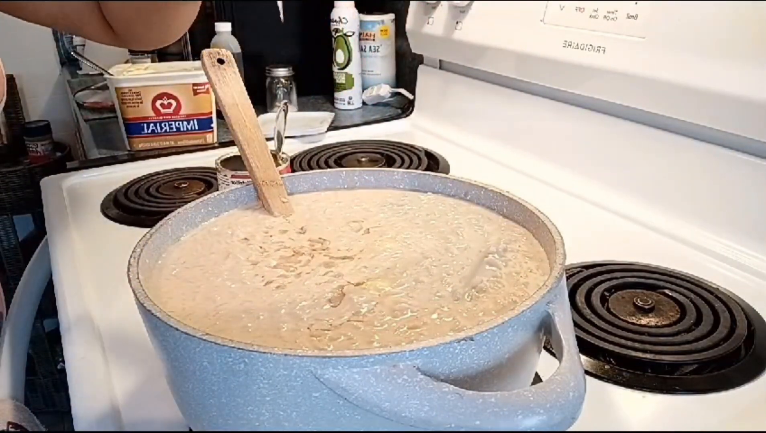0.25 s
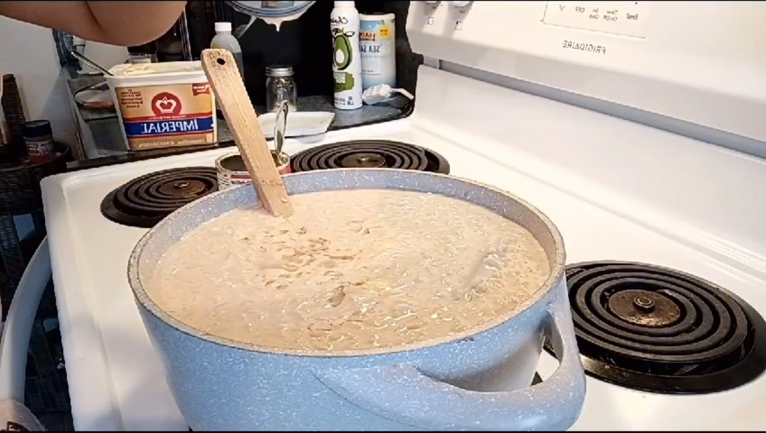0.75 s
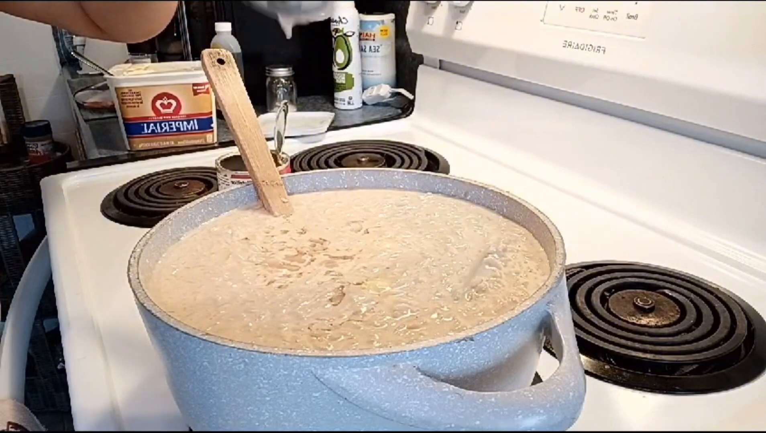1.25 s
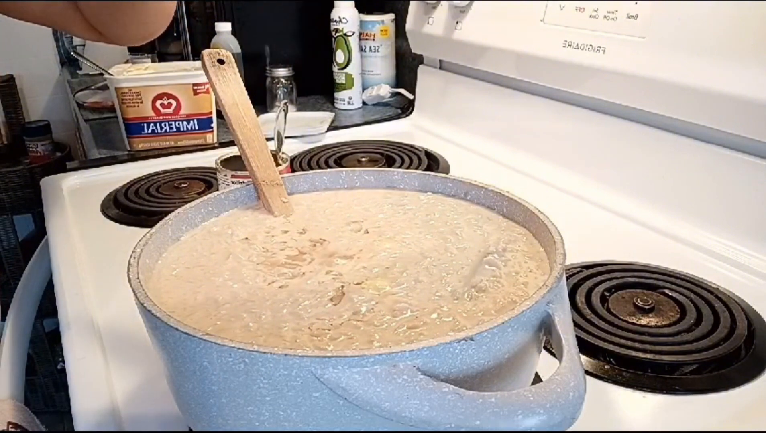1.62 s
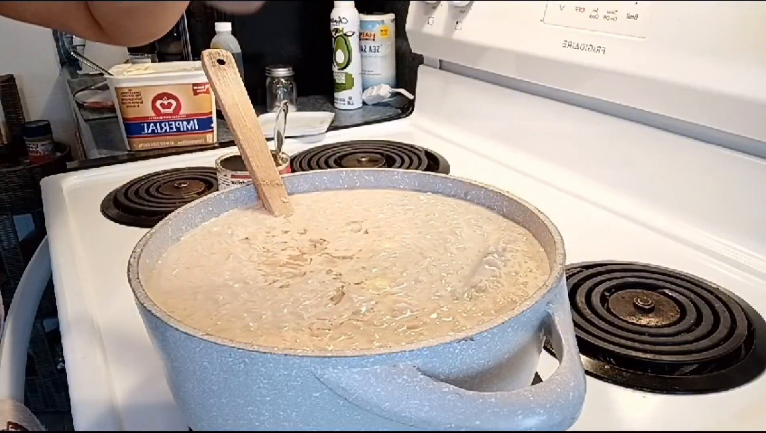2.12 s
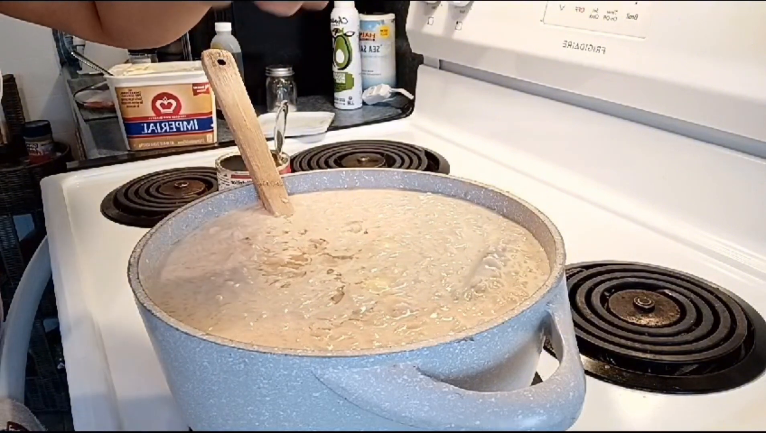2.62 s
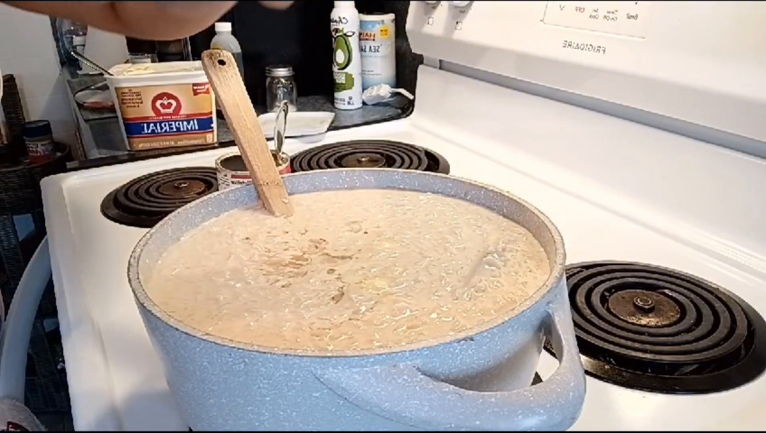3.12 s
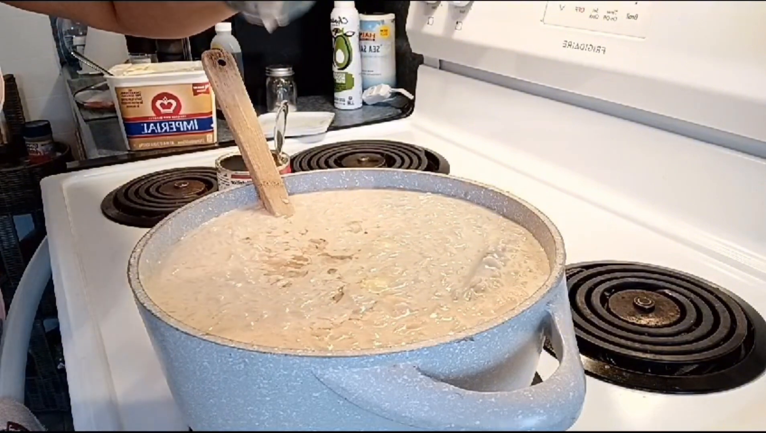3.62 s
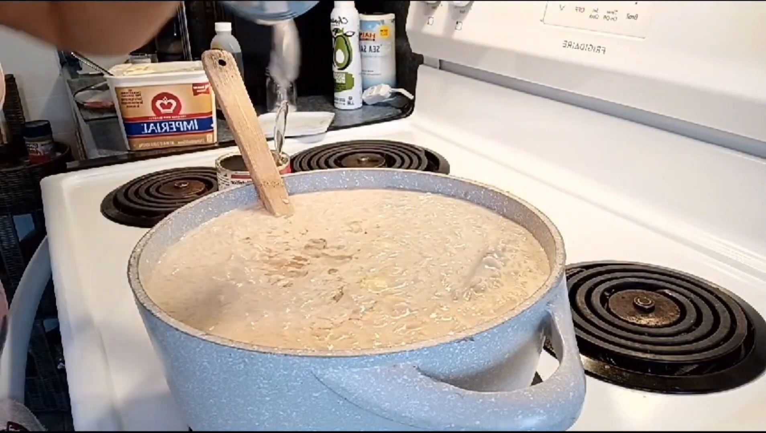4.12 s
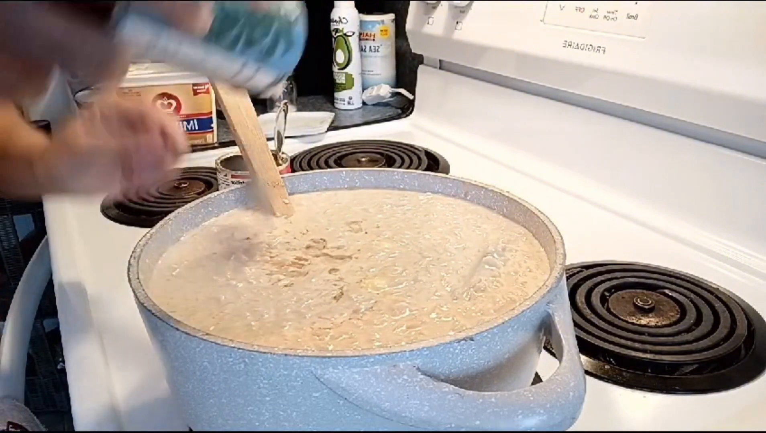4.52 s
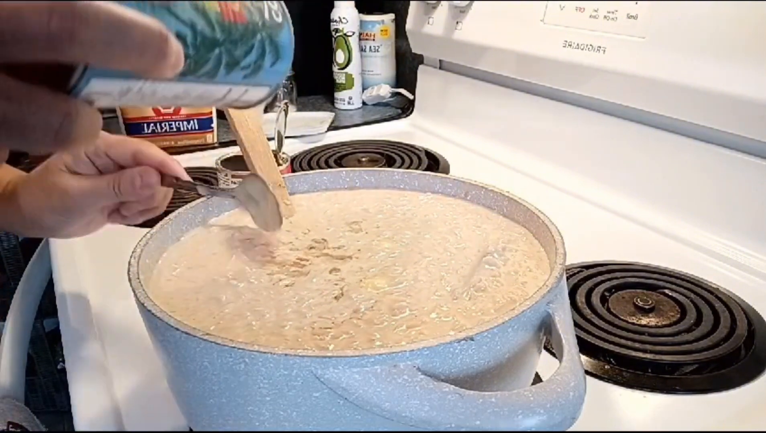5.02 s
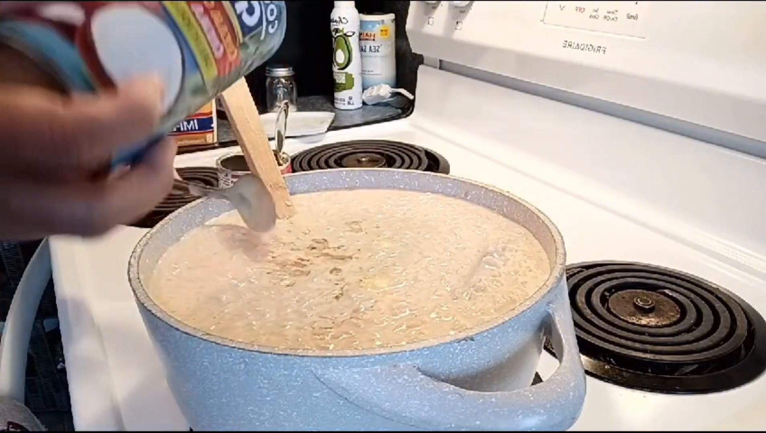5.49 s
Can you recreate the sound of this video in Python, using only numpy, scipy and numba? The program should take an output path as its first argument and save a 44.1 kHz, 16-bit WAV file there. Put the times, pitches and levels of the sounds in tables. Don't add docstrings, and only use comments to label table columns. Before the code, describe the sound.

Light hollow knocks and short scratchy scrapes come from a spoon in a half-empty can, sparser and quieter midway. A hard knock leads into a loud stuttering scrape, then a brief lull with a dull gluey groan. Ten dry, bright metallic clacks with low thumps finish, echoing briefly over low room hum, heard close up in stereo.

```python
import sys
import numpy as np
from scipy import signal
from scipy.fft import rfft, irfft
from scipy.io import wavfile
from numba import njit

SR = 44100
rng = np.random.default_rng(int(sys.argv[2]) if len(sys.argv) > 2 else 0)


def boost_factor(decibels):
    exponent = np.asarray(decibels, float) / 20
    return 10 ** exponent


def persist_wave(psi):
    counts = np.round(np.clip(psi, -1, 1) * 32767).astype(np.int16)
    wavfile.write(sys.argv[1], SR, np.atleast_2d(counts).T)


N = 253569
T = np.arange(N) / SR
SIDES = np.array([[1], [-1]])
SIZZLE_HZ, STEADY_TOP_HZ, TOP_HZ = 7700, 15900, 16900
GRIP_EASES_S = 2.66

# (time [s], blow [dB], air [dB], wall [dB], upper wall [dB])
KNOCKS = [(0.128, -43, -27, -4.5, -15), (0.204, -25, -9, -6.5, -44), (0.297, -40.5, -2, -19, -5.5),
          (0.556, -27, -1, -13, -17), (0.664, -32.5, -19, -7, -2.5), (0.696, -30.5, -1.5, -32, -5),
          (0.729, -37.5, -1, -37, -20), (0.777, -33.5, -9, -2, -44.5), (0.819, -35.5, -6, -3, -41),
          (0.862, -26.5, -7, -19, 2.5), (0.991, -33, -8, -45, -23), (1.307, -16.5, -18.5, -8.5, -6.5),
          (2.187, -61, -8, -43, -20), (2.297, -64, -1.5, -4, -21), (2.563, -47, -8, -45, -19),
          (2.937, -8, -9, 0.5, -50), (2.962, -24, -33, -18, -26), (3.003, -25, -2.5, -1, -34),
          (3.021, -43, -4, -20, -32), (3.484, -17, -8.5, -28, -22)]
# (time [s], blow [dB], rim pitch [Hz], sharpness [dB], thump [dB])
RAPS = [
    (4.3215, -26.5, 6050, -28, -11.5),
    (4.439, -17.5, 6420, -13.5, -26),
    (4.6024, -14, 6580, -20, -12),
    (4.778, -13, 6420, -18, -11),
    (4.936, -9.5, 6530, -21, -10.5),
    (5.0912, -9.5, 6780, -19, -12),
    (5.2492, -15, 6810, -13, -11.5),
    (5.4077, -13, 6940, -12.5, -10),
    (5.5758, -17.5, 6720, -11, -12),
    (5.7338, -8, 6400, -14, -16.5),
]
# (body pitch [Hz], body [dB], middle [dB], rim [dB], rim echo [dB])
RAP_SHAPE = [
    (2900, -20, -13.5, -22, 1.5),
    (3100, -24.5, -17, -18.5, 0.5),
    (3100, -25, -18.5, -17, -0.5),
    (3010, -28, -16.5, -15, -2.5),
    (3010, -27.5, -18.5, -19.5, -0.5),
    (3020, -21.5, -19.5, -19.5, -5.5),
    (3020, -20, -20, -19, 0.5),
    (2900, -19.5, -19, -19, -0.5),
    (2800, -17, -17.5, -15.5, -0.5),
    (2830, -21.5, -23.5, -26, 0.5),
]


def level(x, db):
    return x * boost_factor(db) / np.sqrt(np.mean(x ** 2))


def colour(x, table):
    hz, db = np.transpose(table)
    f = np.maximum(np.fft.rfftfreq(x.shape[-1], 1 / SR), 1)
    gain = boost_factor(np.interp(np.log(f), np.log(hz), db))
    return irfft(rfft(x) * gain, x.shape[-1])


def band(x, lo_hz, hi_hz):
    return signal.sosfilt(signal.butter(2, [lo_hz, min(hi_hz, .45 * SR)], "band", fs=SR, output="sos"), x)


def dip(x, hz, width_hz, depth):
    return x - depth * signal.lfilter(*signal.iirpeak(hz, hz / width_hz, SR), x)


def pan(db):
    return boost_factor(np.outer([.5, -.5], db))


def walk(rate, db):
    return np.interp(T, np.arange(400) / rate, boost_factor(db * rng.standard_normal(400)))


@njit
def ring(x, hz, t60):
    y, z, r = np.empty(len(x), np.complex128), 0j, np.exp(-np.log(1000) / (t60 * SR))
    for i in range(len(x)):
        z = z * r * np.exp(2j * np.pi * hz[i] / SR) + x[i] + 1e-18
        y[i] = z
    return y


def swell(x, hz, t60):
    return ring(ring(x, hz, t60).imag, hz, t60) / (t60 * SR / 9)


def ports(z, hz, skew_s, turn=None):
    chance = np.pi * hz * skew_s * rng.standard_normal()
    turn = chance if turn is None else turn
    return np.cos(turn) * z.imag + np.sin(turn) * z.real * SIDES


def modes(x, table, skew_s=1e-4, patchy_db=0., turn=None):
    out = 0
    for hz, db, t60 in table:
        pole = np.exp(2j * np.pi * hz / SR - np.log(1000) / (t60 * SR))
        drive = x * walk(11, patchy_db) + 1e-18
        out = out + ports(signal.lfilter([boost_factor(db)], [1, -pole], drive), hz, skew_s, turn)
    return out


def blows(times, db):
    x = np.zeros(N)
    x[np.minimum((times * SR).astype(int), N - 1)] = boost_factor(db)
    return x


def fade(x, tau_s):
    return signal.lfilter([1], [1, -np.exp(-1 / (tau_s * SR))], x)


def bursts(times, db, hz, length_s):
    z, t = np.zeros(N + SR, complex), np.arange(int(length_s * SR)) / SR
    shape = np.sin(np.pi * t / length_s) ** 0.76
    for s, gain, f in zip(times, boost_factor(db), hz):
        start = int(s * SR)
        z[start:start + len(t)] += gain * shape * np.exp(2j * np.pi * f * t)
    return z[:N]


def swells(s, hold_s, db, rise_db_s, fall_db_s):
    t = np.arange(0, T[-1], .001)[:, None]
    rise = rise_db_s * np.maximum(s - t, 0)
    fall = fall_db_s * np.maximum(t - s - hold_s, 0)
    return np.interp(T, t[:, 0], 20 * np.log10(boost_factor(db - rise - fall).sum(axis=1) + 1e-6))


def grit(rate, scatter_db, patchy_db=3.0):
    slips = (rng.random(N) < rate / SR) * rng.standard_normal(N)
    slips = slips * boost_factor(scatter_db * rng.exponential(size=N))
    return level(slips * walk(65, patchy_db), 0)


def can():
    # (time [s], air pitch [Hz], left minus right [dB], mouth towards the phone [dB])
    mouth = [(0.0, 693, 0, -2.5), (.2, 591, 0.5, -14.5), (.5, 582, -21, 48), (.56, 649, 0.5, -6.5),
             (.66, 694, -2.5, -2.5), (.74, 533, 2, 0), (.86, 629, 0.5, -7), (1.03, 591, -7.5, -5.5),
             (1.3, 666, -1, -3), (1.37, 585, 4, -8), (1.8, 640, 0, 4.5), (2.18, 595, 1.5, 23),
             (2.45, 611, 1, 18), (2.63, 623, -1, 8.5), (2.94, 619, 0.5, -4), (3.1, 624, -6, -1.5),
             (3.32, 646, 2.5, -2.5), (3.6, 587.6, -6, 2.5), (4.3, 612, -3.5, 7)]
    s, *columns = np.transpose(mouth)
    air_hz, pan_db, facing_db = (np.interp(T, s, c) for c in columns)
    slip, other = (grit(6000, 2.3) for _ in range(2))
    hiss_db = contact("edge")
    inside = air_column(slip, air_hz) + walls(slip, other, hiss_db) + edge_hiss(slip, other, hiss_db, facing_db)
    return inside * pan(pan_db)


def contact(part):
    # (time [s], hold [s], pressure [dB], air share [dB], wall share [dB])
    skids = [(0.0, 0.0097, -33, -11, -7.5), (.126, 0.022, -42, -1, -1.5), (.203, 0.014, -47, 3, -14),
             (.297, 0.013, -54, 0, -42), (.556, 0.13, -53, 8, -26), (.661, 0.032, -45, -15.5, -38),
             (.698, 0.02, -59, 24, -36), (.777, 0.039, -58, 22, -10), (.86, 0.0022, -30, -23.5, 4),
             (1.307, 0.013, -33.5, 4, 4), (2.183, 0.0065, -52, 0.5, -1.5), (2.405, 0.023, -58.5, -4, -33),
             (2.937, 0.0041, -28, -0.5, 14), (3.232, 0.034, -38.5, 1, -19), (2.562, 0.024, -72, -20, -21)]
    # (time [s], hold [s], pressure [dB], air share [dB], wall share [dB])
    swipes = [(.82, 0.044, -54, 1, -23), (.94, 0.051, -35.5, -1.5, -5.5), (1.36, 0.04, -45.5, -1, -8),
              (1.465, 0.035, -39.5, -8, -12), (1.6, 0.062, -51.5, 4, -2.5), (1.87, 0.032, -59, 11, -2),
              (1.99, 0.073, -88.5, 27, -2.5), (2.24, 0.0062, -81, 14, -14.5),
              (2.373, 0.0019, -60, 9.5, 3.5), (2.5, 0.0035, -63.5, 17.5, -10),
              (2.575, 0.084, -42, -2.5, -25), (2.7, 0.012, -48, 0, 10.5), (2.795, 0.031, -44, -0.5, -1),
              (2.85, 0.096, -49.5, 1, -15), (3.03, 0.042, -55, 4.5, 8), (3.19, 0.038, -47, 3.5, 10),
              (3.25, 0.028, -46, 13.5, -4), (3.3, 0.045, -32.5, -6.5, -19), (3.4, 0.07, -35, 5.5, -7),
              (3.49, 0.07, -61.5, 21, -9), (3.55, 0.012, -61, 12, -9), (3.7, 0.024, -87, 26, 16),
              (3.83, 0.048, -88, 17, -13), (4.06, 0.048, -68.5, 7, -9)]
    both = 0
    for table, rise_db_s, fall_db_s in ((skids, 6002.5, 334.5), (swipes, 421, 329)):
        s, hold, db, air, wall = np.transpose(table)
        share = {"edge": 0, "air": air, "wall": wall}[part]
        both = both + boost_factor(swells(s, hold, db + share, rise_db_s, fall_db_s))
    return 20 * np.log10(both)


def air_column(slip, air_hz):
    # (multiple of the air pitch [1], level [dB], t60 [s])
    partials = [(0.899, -40, 0.36), (0.998, -3, 0.11), (1.079, -8, 0.12), (1.18, -28.5, 0.029)]
    # (time [s], peak [dB])
    judders = [(0.207, -28), (0.235, -42), (0.26, -49.5), (0.301, -41.5), (0.563, -38.5), (0.668, -42.5),
               (0.7, -38), (0.731, -36.5), (0.779, -44.5), (0.795, -48.5), (0.824, -39), (0.844, -58),
               (0.864, -41.5), (0.971, -39), (0.994, -32.5), (1.013, -43), (1.311, -38), (1.332, -42),
               (1.373, -44), (2.797, -46), (2.824, -45.5), (2.837, -42), (2.851, -38), (3.209, -44.5),
               (3.23, -38), (3.24, -40), (3.253, -36.5), (3.266, -34), (3.283, -24.5), (3.3, -27),
               (3.308, -33), (3.321, -22), (3.331, -28), (3.342, -23), (3.352, -36), (3.363, -32.5),
               (3.376, -28), (3.39, -28), (3.404, -24), (3.416, -25.5), (3.427, -32), (3.439, -28.5),
               (3.45, -36.5), (3.458, -50.5), (3.468, -35.5), (3.476, -43.5), (3.487, -19.5),
               (3.504, -32.5), (3.516, -27), (3.529, -50), (3.546, -34.5), (3.569, -43.5)]
    t, db, air, _, _ = np.transpose(KNOCKS)
    drive = band(slip * boost_factor(contact("air") - 31.5) + blows(t, db + air - 4), 485, 1000)
    hum = 0
    for multiple, gain_db, t60 in partials:
        tone = ring(drive * walk(22, 1.0), multiple * air_hz, t60)
        hum = hum + boost_factor(gain_db) * ports(tone, 650, 0.00038)
    pops = np.array(judders)
    firm, loose = pops[pops[:, 0] < GRIP_EASES_S], pops[pops[:, 0] > GRIP_EASES_S]
    for rows, length_s in ((firm, 0.01403), (loose, .009)):
        when, size = rows.T
        pop = bursts(when - length_s / 2, size - 2.5, np.interp(when, T, air_hz), length_s)
        hum += ports(pop, 600, 0.0001)
    return hum


def walls(slip, other, hiss_db):
    # (frequency [Hz], level [dB], t60 [s])
    main = [(1135, -20, .07), (1236, -11, .15), (1283, -3, .24), (1390, -20, .07)]
    # (frequency [Hz], level [dB], t60 [s])
    second = [(2378, -15, .1), (2422, -9, .12), (3120, -15, .06), (3495, -17, .14), (6890, -18, .06)]
    # (frequency [Hz], level [dB], t60 [s])
    high = [(1827, 4, 0.037), (2030, -15.5, 0.042), (2540, -14.5, 0.085), (3234, -5.5, 0.19),
            (4610, 0, 0.026), (4820, -11.5, 0.1), (4850, -21.5, 0.083), (5560, -14, 0.067),
            (5360, -5, 0.052), (5600, -4, 0.09), (5600, -10.5, 0.044), (6360, -17, 0.047)]
    t, db, _, wall, upper = np.transpose(KNOCKS)
    wall_db = contact("wall")
    reach = wall - 12.5 + .9 * (db - db.max())
    main_drive = slip * boost_factor(wall_db - 32.5) + blows(t, db + wall - 8.5)
    second_drive = slip * boost_factor(wall_db - 46.5) * walk(4.7, 11) + blows(t, db + reach + 10.5)
    high_drive = slip * boost_factor(hiss_db - 36.0) + blows(t, db + upper - 7.5)
    out = singing(other) + gripped(band(main_drive, 1180, 1550), main, patchy_db=4.5)
    out += gripped(band(second_drive, 2100, 7500), second, patchy_db=6.5)
    return out + gripped(band(high_drive, 510, 9000), high, patchy_db=0.0)


def gripped(x, table, patchy_db):
    firm = T < GRIP_EASES_S
    damped = np.array(table) * [1, 1, 0.26]
    return modes(x * firm, damped, patchy_db=patchy_db) + modes(x * ~firm, table, patchy_db=patchy_db)


def singing(slip):
    # (time [s], hold [s], pitch [Hz], level
    # [dB])
    sings = [(0.294, 0.011, 1750, -57), (0.293, 0.013, 3117, -72), (0.334, 0.013, 3680, -79),
             (0.554, 0.08, 3210, -69.5), (0.563, 0.034, 4600, -68), (0.556, 0.0065, 1215, -47.5),
             (0.66, 0.0047, 963, -42), (0.86, .012, 1467, -43.5), (.665, 0.047, 2350, -59),
             (.67, 0.055, 3220, -68), (.78, 0.021, 3230, -69), (0.786, 0.041, 1040, -63),
             (.865, 0.021, 1704, -52.5), (0.868, 0.02, 3655, -50), (0.885, 0.13, 2510, -68),
             (0.97, 0.02, 1763, -48), (1.308, 0.025, 4610, -48), (1.31, 0.021, 5810, -47.5),
             (1.321, 0.017, 2950, -62), (1.308, 0.024, 2010, -57), (1.441, 0.054, 4560, -57),
             (1.461, 0.035, 5230, -55), (1.452, 0.047, 882, -58.5), (1.593, 0.043, 4610, -68),
             (1.63, 0.055, 3100, -68.5), (1.855, 0.057, 4410, -76.5), (1.878, 0.023, 2347, -66),
             (2.17, 0.044, 1860, -70), (2.346, 0.022, 1465, -71.5), (2.565, 0.096, 5540, -55.5),
             (2.573, 0.054, 2835, -55), (2.665, 0.067, 1840, -61), (2.796, 0.051, 1882, -56),
             (2.774, 0.032, 3290, -60.5), (2.933, 0.026, 5200, -63.5), (3.067, 0.013, 4550, -58.5),
             (3.07, 0.019, 2900, -55.5), (3.303, 0.051, 2945, -46.5), (3.309, 0.074, 2160, -45.5),
             (3.316, 0.031, 1740, -48.5), (3.404, 0.024, 2150, -45.5), (3.42, 0.04, 2440, -49),
             (3.492, 0.11, 1800, -67), (3.7, 0.066, 1583, -77),
             (.001, 0.052, 5140, -55), (0.122, 0.042, 5560, -60), (.865, 0.027, 5110, -44.5),
                (1.998, .05, 1290, -73.5), (2.175, 0.036, 5640, -64), (2.409, 0.031, 3010, -66),
                (2.412, 0.033, 4420, -69), (2.942, 0.033, 6890, -53.5), (2.945, 0.056, 3550, -45.5),
                (3.294, 0.037, 4500, -53.5), (3.296, .05, 5420, -54), (3.397, 0.1, 5600, -50.5),
                (3.73, 0.15, 4210, -85.5), (3.714, 0.15, 1205, -67.5), (3.766, 0.06, 331, -61),
                (3.992, .13, 1266, -77)]
    # (time [s], hold [s], pitch [Hz], level [dB])
    bowings = [
        (2.936, .012, 1283, -29),
        (3.15, .05, 1283, -53),
        (3.265, .025, 1283, -42),
        (3.295, .02, 1283, -36),
        (3.322, .055, 1283, -31),
        (3.394, .035, 1283, -32),
        (3.485, .02, 1283, -43),
        (3.69, .07, 1283, -65),
    ]
    rise_s, t60_s, bowed_t60_s = 0.0051, 0.08, .3
    turn = 0.33
    brief = sings
    out = np.zeros((2, N))
    for k, (s, hold, hz, db) in enumerate(brief + bowings):
        bowed = k >= len(brief)
        r = np.exp(-np.log(1000) / ((bowed_t60_s if bowed else t60_s) * SR))
        span = slice(int(max(s, 0) * SR), int((s + hold + t60_s) * SR))
        t = T[span] - s
        drive = slip[0 if bowed else span.start:span.stop]
        z = signal.lfilter([np.sqrt(1 - r * r)], [1, -r * np.exp(2j * np.pi * hz / SR)], drive)[-len(t):]
        z = z / (np.abs(z) + 1e-9) ** (1 if bowed else .7)
        shape = np.clip(t / rise_s, 0, 1) * boost_factor(db - 60 * np.maximum(t - hold, 0) / t60_s)
        sign = 1 if bowed else (-1) ** k
        out[:, span] += ports(z * shape * np.sqrt(2) / np.cos(turn), hz, 0, turn * sign)
    return out


def edge_hiss(slip, other, hiss_db, facing_db):
    # (frequency [Hz], density [dB per Hz])
    spectrum = [(470, -58), (800, -5.5), (1000, -14.5), (1260, -5.5), (1450, -51.5), (2150, -9.5),
                (3940, -15), (5350, -10), (7340, -26), (8020, -37), (8870, -33.5), (13600, -42),
                (15100, -28.5), (15900, -31.5), (16500, -61)]
    # (time [s], peak [dB])
    ticks = [(3.2138, -39), (3.2328, -31.5), (3.2493, -32), (3.2647, -33), (3.2952, -28), (3.3066, -19),
             (3.4014, -19), (3.4134, -17), (3.4254, -22), (3.4373, -16), (2.5628, -42.5), (2.5783, -41),
             (2.6232, -40.5), (2.6995, -37.5), (2.7853, -44.5), (2.7928, -29.5), (2.8287, -45),
             (2.909, -43.5), (0.5553, -44), (0.6616, -39.5), (0.698, -37), (0.7833, -46.5), (0.8197, -49.5),
             (0.8604, -23), (0.9576, -42), (1.3084, -20), (1.4475, -42), (1.4685, -32)]
    t, db, _, _, upper = np.transpose(KNOCKS)
    sizzle_db = -59.5 + 1.75 * (hiss_db + 41) + facing_db
    edge = level(colour(np.array([slip + 1.03 * other, slip - 1.2 * other]), spectrum), 0)
    tick_s, tick_db = np.transpose(ticks)
    crack = fade(blows(t, db + upper - 12.0), 0.0091) + fade(blows(tick_s, tick_db - 6), 0.0028)
    patches = 0
    for lo in 1400 * 1.519 ** np.arange(4):
        patches = patches + band(edge, lo, 1.606 * lo) * walk(30, 4.65)
    sizzle = band(edge, SIZZLE_HZ, STEADY_TOP_HZ) * walk(17, 2.8)
    return patches * (boost_factor(hiss_db - 5.5) + crack) + sizzle * (boost_factor(sizzle_db + 21.5) + .3 * crack)


def paste():
    # (time [s], hold [s], pitch [Hz], groan [dB], air share [dB])
    drags = [
        (2.673, 0.11, 322, -62.5, -16),
        (2.913, .005, 377, -50, -20),
        (3.28, 0.053, 476, -61.5, 19),
        (3.425, 0.067, 420, -48.5, 5),
        (3.702, 0.026, 442, -42, 6),
        (3.752, 0.075, 440, -51.5, 6),
        (4.026, 0.039, 372, -52.5, -19.5),
        (5.53, 0.0022, 372, -46.5, 6),
        (5.605, 0.024, 312, -42, -5),
    ]
    s, hold, hz, db, share = np.transpose(drags)
    pull = grit(9000, 0.66, 0.94)
    groan_db, air_db = (swells(s, hold, d, 379.5, 237) for d in (db, db + share))
    hz, low = np.interp(T, s, hz), pull * boost_factor(groan_db - 19.5)
    groan = ring(band(low, 320, 550), hz, 0.058)
    groan = groan + boost_factor(-28.0) * ring(band(low, 1100, 1600), 3 * hz, 0.032)
    air = ring(band(pull * boost_factor(air_db - 30.0), 310, 770), 581 * walk(14, .15), .17)
    return ports(groan, 400, 0.000067) + ports(air, 581, 0.00017)


def rim_clack():
    # (frequency [Hz], level [dB], t60 [s])
    low_modes = [(877, -10, 0.028), (3930, 1, 0.0035), (5290, -6, 0.004)]
    # (frequency [Hz], level [dB], t60 [s])
    high_modes = [(7700, -20, 0.0066), (9100, 8.5, 0.0057), (11020, 2, 0.0096), (14400, 6, 0.016)]
    t, db, high_hz, sharp, _ = np.transpose(RAPS)
    low_hz, low, between, high, echo = np.transpose(RAP_SHAPE)
    contact_s = .0022
    body_turn, rim_turn, mode_turn = 0.77, 0.56, .75
    clack = ports(bursts(t, db + low + 18.0, low_hz, contact_s), 0, 0, body_turn)
    clack += ports(bursts(t, db + high + 18.5, high_hz, contact_s), 0, 0, rim_turn)
    middle = band(blows(t, db + between + 14), 960, 10630)
    clack += modes(middle, low_modes, patchy_db=3.0, turn=mode_turn)
    top = band(blows(t, db + sharp + 0.5), SIZZLE_HZ, TOP_HZ)
    clack += modes(top, high_modes, patchy_db=2.0, turn=mode_turn) * pan(4)
    clack = clack * pan(-5)
    return clack, clack[1] * boost_factor(np.interp(T, t, echo))


def rap_jolt():
    # (frequency [Hz], density [dB per Hz])
    spectrum = [(35, -49), (60, 5), (103, -2.5), (140, -1), (334, -9), (453, -4.5), (742, -5.5),
                (2970, -18.5), (5220, -16.5), (6450, -10), (7600, -13.5), (12700, -16), (13200, -18),
                (14300, -27), (15400, -9.5), (16500, -56)]
    t, db, _, sharp, _ = np.transpose(RAPS)
    _, _, between, high, echo = np.transpose(RAP_SHAPE)
    rattle = level(colour(rng.standard_normal(N), spectrum), 0)
    jolt = band(rattle, 208, 3100) * fade(blows(t, db - 21.5), 0.032)
    jolt += band(rattle, 1490, 3730) * fade(blows(t, db + between - 5.0), 0.022)
    jolt += band(rattle, 4220, SIZZLE_HZ) * fade(blows(t, db + high + echo + 15.0), 0.00067)
    jolt = jolt * walk(11, 1)
    return jolt + band(rattle, SIZZLE_HZ, STEADY_TOP_HZ) * fade(blows(t, db + sharp + 3.0), 0.0044)


def arm_thump():
    t, db, _, _, thump = np.transpose(RAPS)
    push = signal.lfilter(np.hanning(200) / 110, [1], blows(t + 0.02824, db + thump))
    stove, pot = (swell(push, np.full(N, hz), t60).imag for hz, t60 in ((108., 0.098), (235., 0.31)))
    return stove + boost_factor(-11.0) * pot


def room(x, like=0.94):
    # (frequency [Hz], t60 [s], build-up [s])
    decays = [(103, 0.72, 0.0088), (300, 0.22, 0.019), (796, 0.29, 0.009), (1980, 0.24, 0.00047),
              (5540, 0.33, 0.00019), (12500, 0.21, 0.00067)]
    t = T[:SR // 2]
    hz, t60, rise = np.transpose(decays)
    tail = 0
    for f in 60 * 2. ** np.arange(9):
        decay, build = (np.interp(np.log(f), np.log(hz), c) for c in (t60, rise))
        mid, side = band(rng.standard_normal((2, len(t))), f / np.sqrt(2), f * np.sqrt(2))
        pair = mid + np.clip(like * np.log2(f / 50) / 3, 0, 1) * side * SIDES
        tail = tail + pair * boost_factor(-60 * t / decay) * (1 - np.exp(-(t / build) ** 2))
    return signal.fftconvolve(x[None], tail / np.sqrt(np.sum(tail ** 2) / 2), axes=1)[:, :N]


def kitchen():
    # (frequency [Hz], density [dB per Hz])
    spectrum = [(18, -54.5), (30, -3), (107, -2), (506, -14.5), (593, -14), (904, -28.5), (1120, -32),
                (1240, -23), (1450, -32.5), (5590, -34), (7880, -35.5), (9480, -34), (13400, -40.5),
                (15200, -29.5), (16500, -60.5)]
    # (time [s], hold [s], rumble [dB], hum share [dB])
    shudders = [
        (0.147, 0.057, -89, -14),
        (1.014, 0.28, -64.5, -36.5),
        (1.658, 0.019, -82, -1),
        (1.957, 0.031, -65.5, -8.5),
        (2.927, 0.14, -70, -3),
        (3.242, 0.44, -77, 5.5),
        (3.695, 0.14, -64, -8),
        (4.037, 0.063, -64, -2.5),
    ]
    s, hold, db, share = np.transpose(shudders)
    mid, side = colour(rng.standard_normal((2, N)), spectrum)
    side = band(side, 200, TOP_HZ) + .3 * band(side, 20, 50)
    floor = level(mid + 0.8 * side * SIDES, -68.5) * walk(4.8, 0.41)
    rumble = level(modes(band(rng.standard_normal(N), 55, 95), [(74.5, 0, .4)]), 0)
    hum_modes = [(118.7, 1.5, 0.47), (187, -2.5, 0.19), (203, -10.0, 0.31), (251.0, 0.5, 0.22)]
    hum = level(modes(band(rng.standard_normal(N), 63, 360), hum_modes, 0.00024), 0)
    rumble *= boost_factor(-71.5) + boost_factor(swells(s, hold, db, 150, 130))
    return floor + rumble + hum * (boost_factor(-70.5) + boost_factor(swells(s, hold, db + share, 150, 140)))


def scene():
    inside = can() + paste()
    clack, sent = rim_clack()
    jolt = rap_jolt()
    wet = room(boost_factor(-6.5) * inside[0] + boost_factor(-5.5) * sent + boost_factor(10.5) * jolt)
    wet = dip(wet, 13750, 1500, .85)
    wet = wet * pan(-0.5 * (T > RAPS[0][0]))
    steady = inside + boost_factor(-2.0) * band(jolt, 1100, TOP_HZ) + arm_thump() + wet + kitchen()
    return clack + signal.sosfilt(signal.ellip(6, .3, 50, STEADY_TOP_HZ, fs=SR, output="sos"), steady)


@njit
def follow(x, attack, release):
    e, y = 0., np.empty(len(x))
    for i in range(len(x)):
        e += (x[i] - e) * (attack if x[i] > e else release)
        y[i] = e
    return y


def low_pass(x):
    return signal.sosfilt(signal.butter(12, 17110, fs=SR, output="sos"), x)


def record(dry):
    x = dip(dry, 7630, 1500, 0.39)
    x = signal.sosfilt(signal.butter(2, 60, "high", fs=SR, output="sos"), x)
    attack_s, release_s = 0.00027, 0.065
    e = follow(np.abs(x).max(axis=0), 1 / (attack_s * SR), 1 / (release_s * SR))
    x = x * np.minimum(1, boost_factor(-21.0) / (e + 1e-9)) ** 0.44
    x = signal.sosfilt(signal.ellip(8, .2, 70, TOP_HZ, fs=SR, output="sos"), x)
    return low_pass(x)


dry = scene()
out = record(dry)
persist_wave(out)
```